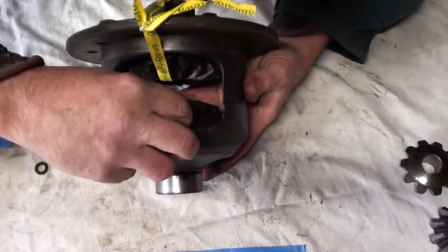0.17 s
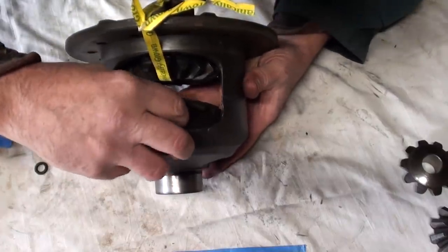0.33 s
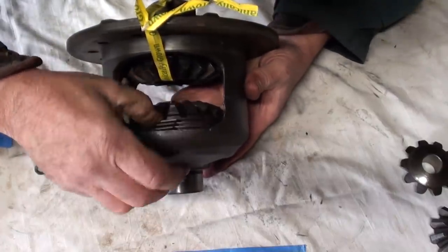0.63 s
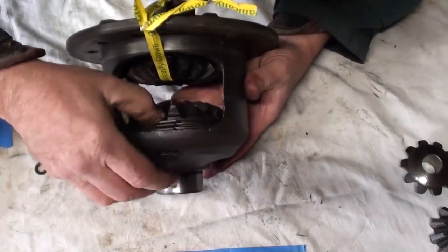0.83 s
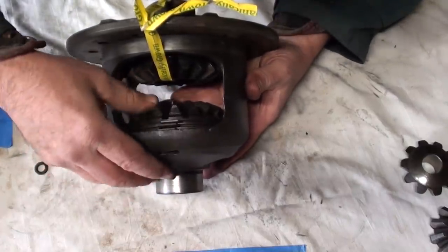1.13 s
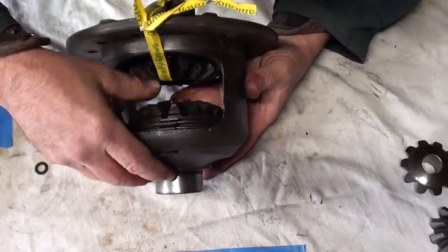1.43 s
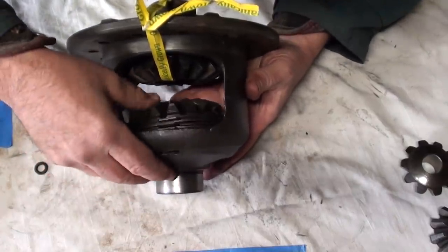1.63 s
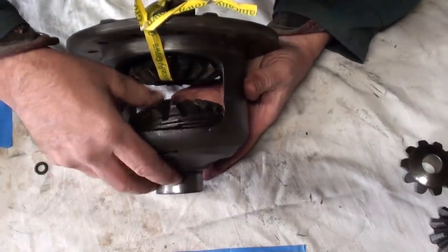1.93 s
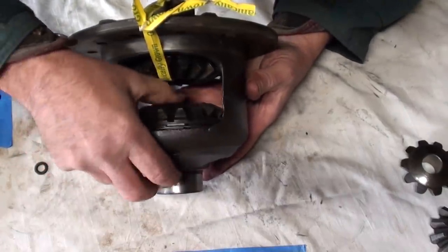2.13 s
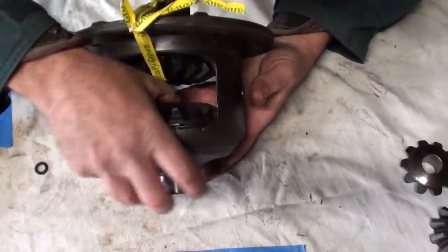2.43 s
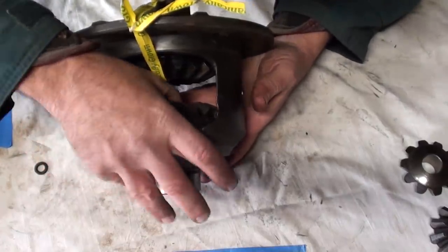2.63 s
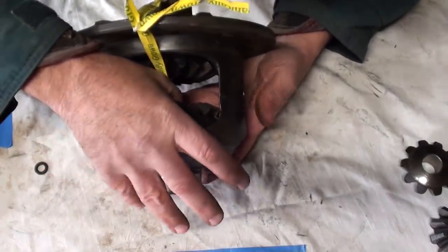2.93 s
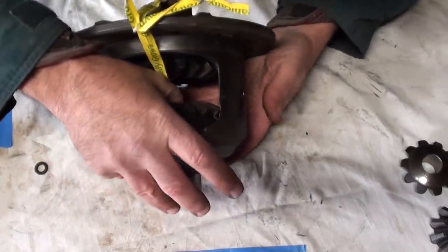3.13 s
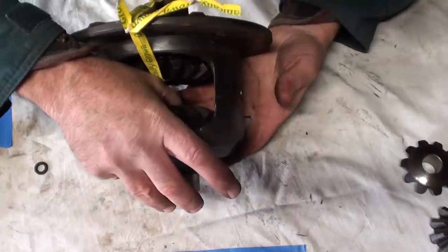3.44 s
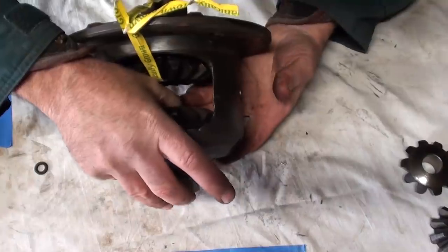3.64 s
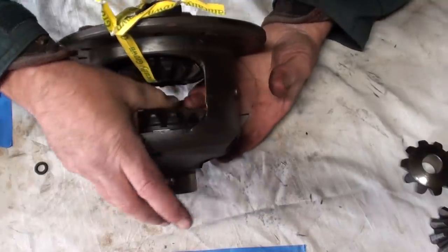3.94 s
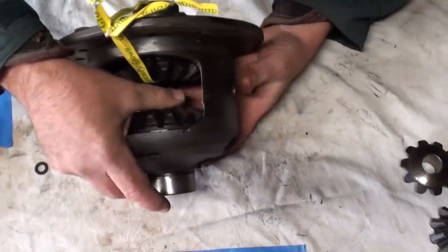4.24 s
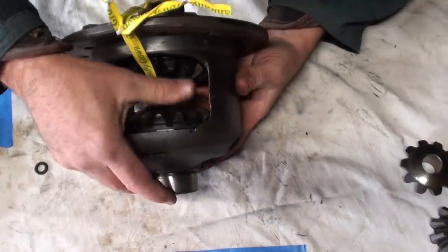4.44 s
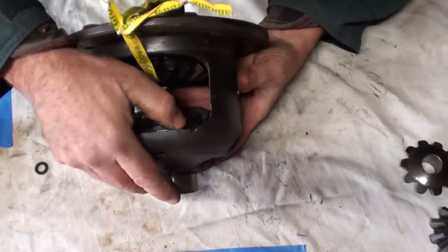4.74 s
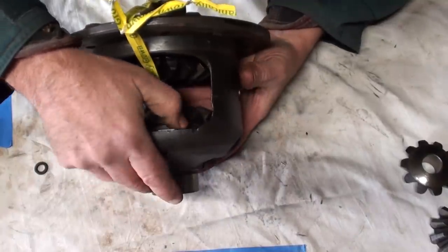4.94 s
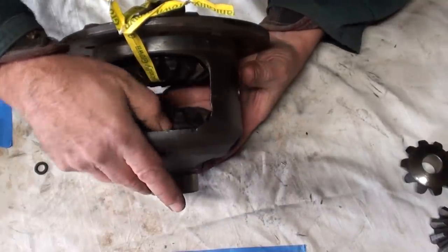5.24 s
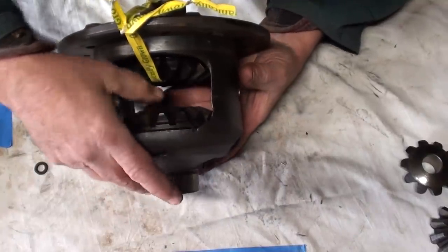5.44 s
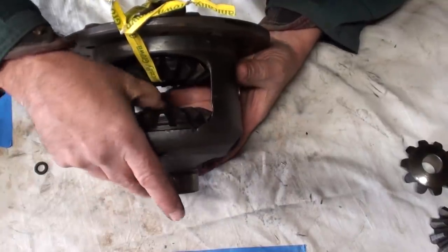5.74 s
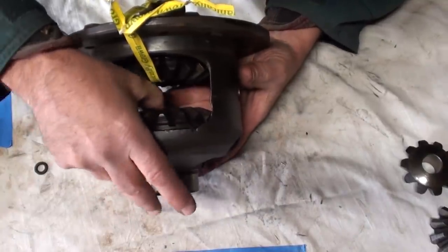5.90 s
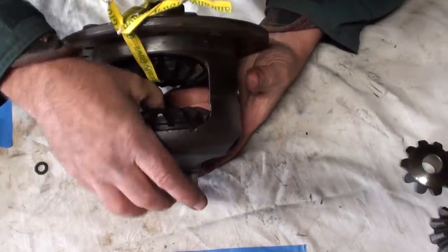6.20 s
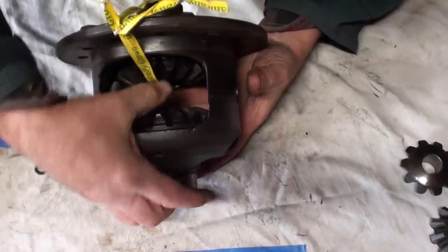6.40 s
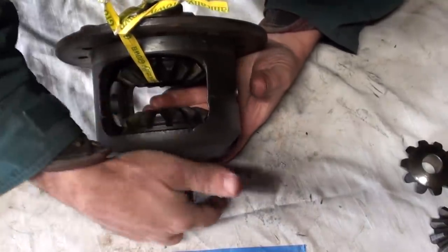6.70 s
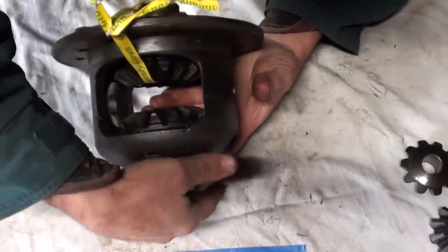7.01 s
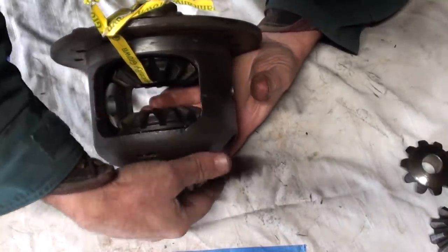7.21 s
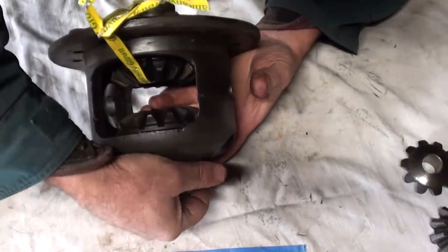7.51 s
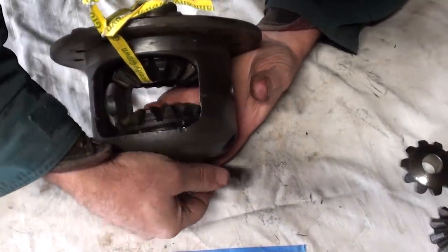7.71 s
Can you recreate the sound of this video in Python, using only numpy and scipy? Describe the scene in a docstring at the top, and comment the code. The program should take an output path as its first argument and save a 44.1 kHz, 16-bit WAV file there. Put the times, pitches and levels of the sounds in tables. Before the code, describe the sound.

A steel gear and thin plates are fitted by hand into a cast metal housing, heard close up in a quiet workshop with a slight short echo. A plate clinks sharply at 0.3 seconds. From 0.8 to about 2 seconds, small clicks, thin clinks and short gritty scrapes follow, while the housing rocks with soft thuds on a cloth-covered bench. After a lull, the loudest burst of clicks comes at 3.4 seconds with a scrape and a heavy thud, then another sharp click and bump at 3.6 and lighter ticks. Near 5.1 seconds the gear is struck and rings brightly, choked at once by a grip. A single click at 6.1 leads to soft bumps, a very faint creak at 7.2, and a last metallic knock with a deep thud at 7.7. Faint finger rubbing and steady low room hiss continue throughout.

```python
"""A steel gear and clutch plates are worked by hand into a cast housing on a cloth-covered bench.
First a plate clinks; then parts click and scrape, and the rocking housing thuds on the bench.
After a lull, loud clicks come with a heavy thud at 3.4 s. Near 5.1 s the gear rings until it is gripped.
A faint creak at 7.2 s leads to a last knock and thud. Fingers rub and a quiet workshop hisses all along."""
import sys
import numpy as np
from scipy import signal
from scipy.fft import rfft, irfft
from scipy.io import wavfile
from scipy.ndimage import uniform_filter1d

SR = 44100
rng = np.random.default_rng(int(sys.argv[2]) if len(sys.argv) > 2 else 0)


def transcribe(signal):
    """Save signal, clipped to [-1, 1], as a 16-bit WAV file at the path in sys.argv[1]."""
    frames = np.atleast_2d(signal).T
    limited = np.clip(frames, -1, 1)
    pcm = np.round(limited * 32767).astype(np.int16)
    wavfile.write(sys.argv[1], SR, pcm)


N = 346626

# Steel hits steel. Each row: start in seconds, level in dB, centre of the crack's tone in Hz,
# extra gain for the housing's ring in dB.
CLINKS = [(0.0627, -34.5, 5410, -9), (0.3087, 0.5, 8100, -36), (0.321, -5.5, 7300, -16),
          (0.8169, -14, 5100, -34), (0.8254, -16.5, 8100, -23), (0.9215, -28.5, 7200, -11),
          (0.931, -20, 5360, -19.5), (1.3145, -29, 3250, -17), (1.396, -27, 5230, -36),
          (1.413, -32, 3590, -29), (1.473, -31.5, 5100, -16), (1.632, -16, 6440, -10.5),
          (1.6719, -5.5, 7400, -32), (1.69, -34, 3310, -13), (1.73, -22, 8100, -13),
          (1.7392, -8.5, 4760, -29), (1.819, -34, 2480, -18), (1.95, -27, 3330, -13),
          (1.9633, -20.5, 7220, -25), (1.9844, -26, 3270, -16), (2.0217, -29, 4630, -17),
          (2.0796, -31, 5830, -13), (2.725, -23.5, 7450, -37), (3.1943, -24, 1900, -15),
          (3.217, -20, 1510, -20), (3.2278, -28, 1490, -26), (3.321, -35, 5500, -30),
          (3.348, -5.5, 6300, -40), (3.3653, -13, 6900, -8), (3.3742, -2.5, 5070, -17),
          (3.3846, 1, 6600, -15.5), (3.3947, -2.5, 4740, -16.5), (3.4421, -17.5, 5500, -13.5),
          (3.6352, 0, 4360, -28.5), (3.7811, -27.5, 3210, -26), (3.81, -18, 7100, -2.5),
          (3.8244, -12.5, 4900, -15), (3.8679, -29, 5230, -7.5), (3.909, -30, 2330, -14),
          (4.185, -31, 1300, -18), (4.329, -33, 6740, -17), (4.8314, -35, 4800, -32),
          (4.9327, -42, 3420, -23), (5.0119, -22, 3320, -44), (5.039, -36, 7000, -32),
          (5.0673, -23, 1330, -38), (5.0841, -12, 4470, -22.5), (5.111, -3.5, 7050, -16.5),
          (5.1463, -16, 6700, -13), (5.1543, -7, 6460, -17.5), (5.2378, -29, 5260, -18),
          (5.28, -33, 3730, -25), (5.6043, -27, 5170, -33), (5.9498, -26, 6770, -34),
          (5.969, -30, 7100, -41), (6.148, -13, 3730, -20.5), (6.7917, -26, 1270, -33),
          (6.99, -27, 6660, -17.5), (7.6991, -16, 6740, -31), (7.7209, -6, 4140, -12),
          (7.7596, -17, 1780, -19), (7.8554, -20, 7150, -23)]
# The notes (modes) each steel part rings with. Each row: pitch in Hz, level in dB, seconds to fade 60 dB.
HOUSING_HIGH_MODES = [(4750, -12, 0.062), (5230, -8.5, 0.13), (5400, -11.5, 0.21), (6164, -25, .08),
                      (7130, -8.5, 0.11), (7280, -16, 0.17), (7200, -12.5, 0.13), (7870, -15, .09),
                      (8300, -18, .08), (8450, -27, 0.084), (9900, -35, 0.058), (10800, -33, 0.066)]
HOUSING_LOW_MODES = [(1260, -12, 0.031), (1435, -8, 0.026), (1956, -9, .08), (2042, -12, 0.076),
                     (2407, -11.5, .08), (2540, -15.5, 0.054), (3200, -13.5, 0.077)]
GEAR_MODES = [(1523, -32, 0.3), (2438, -19, 0.18), (3086, -20, 0.41), (3467, -25, 0.22), (4760, -5, .2),
              (5280, -11.5, 0.35), (5440, -14, .4), (6760, -11, 0.67), (7150, -0.5, 0.84), (7326, -10, .4),
              (8048, -12, .2), (8724, -25, .3), (9100, -24, .3), (9300, -11, 0.26), (9400, -17, 0.25),
              (10400, -17.5, 0.34), (11750, -21, .4), (12320, -22.5, 0.17), (13730, -35, .2)]
PLATE_MODES = [(1538, -7.5, 0.088), (2520, -16.5, 0.22), (3330, -15, 0.17), (4560, -12, 0.16),
               (5270, -8, 0.13), (6810, -6, 0.069), (7270, -15, 0.19), (7430, 1, 0.06), (7600, -2, .11),
               (8100, -0.5, 0.091), (9430, 0, .1), (10310, -9, .13), (10600, -18, 0.068), (12200, -7, .05)]
SHIM_MODES = [(3314, -8.5, 0.38), (5810, -8, 0.078), (8900, -5, 0.057)]
# Blows on the loose gear. Each row: start in seconds, level in dB, seconds until it is gripped.
GEAR_STRIKES = [(5.111, -10, 0.046), (5.156, -17, 0.01)]
# Blows on a clutch plate and on a shim (a thin spacer). Each row: start in seconds, level in dB.
PLATE_STRIKES = [(.310, -19), (0.321, -28), (0.921, -54), (1.603, -47.5), (1.673, -36), (3.349, -27),
                 (5.068, -48)]
SHIM_STRIKES = [(.322, -45), (.818, -50), (.826, -33.5), (1.642, -30), (1.69, -33), (1.739, -45),
                (1.951, -36.5), (1.985, -51)]
# The housing rocks on the bench. Each row: start in seconds, level in dB, main pitch in Hz.
THUDS = [(0.009, -35.5, 226), (0.033, -31, 340), (0.058, -35, 230), (0.242, -39.5, 344), (0.261, -42, 258),
         (0.307, -35, 258), (0.817, -34.5, 407), (1.017, -30.5, 320), (1.29, -41, 328), (1.313, -25.5, 303),
         (1.401, -40, 355), (1.48, -40, 262), (1.584, -43, 347), (1.634, -34.5, 320), (1.654, -31, 274),
         (1.685, -34, 255), (1.739, -38, 330), (1.95, -31.5, 280), (1.98, -28, 365), (2.05, -38, 245),
         (2.171, -35.5, 312), (2.967, -38, 263), (3.011, -43, 332), (3.036, -31, 333), (3.105, -39.5, 333),
         (3.216, -36.5, 352), (3.351, -36, 312), (3.372, -19.5, 295), (3.394, -32, 283),
         (3.636, -21.5, 369), (3.767, -36.5, 342), (3.821, -35, 263), (3.9, -45, 266), (4.186, -39.5, 324),
         (4.327, -44.5, 397), (4.593, -44.5, 262), (4.74, -37, 332), (4.882, -43, 339), (5.013, -41, 376),
         (5.087, -33, 372), (5.123, -34.5, 262), (5.159, -35.5, 270), (5.229, -44, 356), (5.601, -41, 386),
         (6.148, -30.5, 317), (6.506, -28, 269), (6.79, -28, 303), (6.819, -42, 243), (6.935, -41.5, 242),
         (6.986, -31.5, 246), (7.191, -40.5, 330), (7.718, -25, 267), (7.76, -32.5, 258)]
# Deep shakes of the whole bench as the housing settles. Each row: start in seconds, level in dB.
SHAKES = [(0.3, -53), (1.304, -55), (1.651, -48.5), (1.942, -53), (3.381, -31.5), (3.631, -48),
          (4.349, -58), (5.019, -48), (5.109, -47), (6.138, -40), (6.995, -58), (7.706, -31.5)]
# The notes of the bench. Each row: pitch in Hz, level in dB, seconds to fade 60 dB.
BENCH_TOP_MODES = [(142.4, -16.5, 0.17), (200.4, -18.5, 0.21), (244.7, -12, 0.25), (287.8, -13, 0.17),
                   (340, -12, 0.23), (405.3, -9, 0.13), (568, -21, 0.093), (790, -20.5, 0.11)]
BENCH_DEEP_MODES = [(60.6, -5.5, 0.25), (82.3, -3, 0.33), (105.9, -6, 0.35), (140.4, 3, 0.18)]
# Gritty slides. Each row: start in seconds, length in seconds, level in dB.
SLIDES = [(0, 0.075, -44), (0.218, 0.12, -49), (0.99, 0.043, -48.5), (1.378, 0.029, -47.5),
          (1.471, 0.046, -53), (1.634, .075, -35), (1.947, 0.093, -47.5), (2.411, 0.094, -53),
          (2.5, 0.081, -55), (2.938, 0.14, -57.5), (3.069, 0.19, -54), (3.36, 0.049, -25.5),
          (3.644, 0.11, -54.5), (4.254, .14, -49.5), (4.926, .043, -48.5), (5.112, 0.074, -32.5),
          (5.724, .063, -57), (6.593, 0.056, -54.5), (6.901, 0.15, -59), (7.702, .039, -40)]
# Faint rubbing of fingers and cloth. Each row: time in seconds, level in dB.
RUB_LEVELS = [(0.0, -57), (2.87, -58), (3.24, -53), (4.95, -58), (5.12, -51), (5.39, -57.5), (7.22, -55.5),
              (7.71, -61.5), (7.86, -53.5)]
# The three slips of the creak. Each row: time in seconds, level in dB.
CREAK_SLIPS = [(7.223, -50), (7.252, -47), (7.31, -51)]
# The tone of the rubbing and of the hiss. Each row: frequency in Hz, relative level in dB.
RUB_SPECTRUM = [(300, 4.5), (800, 0), (1500, 0.5), (3000, -1), (5000, 3), (7500, 0.5), (11000, -8),
                (16000, -2.5)]
HISS_SPECTRUM = [(18, -51), (30, -26), (66, 2.5), (233, 1.5), (364, 3.5), (512, 2.5), (740, 2.5),
                 (2170, -4.5), (3220, -6), (3580, 1.5), (3980, -8), (4780, 0), (5740, -4.5), (14800, -13.5),
                 (16000, -9)]
# How alike the hiss is on the left and right. Each row: frequency in Hz, likeness from 0 to 1.
HISS_LIKENESS = [(60, 0.93), (180, 0.68), (550, 0.047), (1650, 0.025), (4970, 0.41), (15000, 0.78)]


def clinks():
    """Steel meets steel in a burst of tiny impacts: a crack, while the housing's ring builds up."""
    out, t = np.zeros(N), np.arange(SR // 4) / SR
    for start, level_db, tone_hz, ring_db in CLINKS:
        contact_s = 0.0034 * np.exp(0.31 * rng.standard_normal())
        progress = t / contact_s
        pressure = progress ** 1.5 * np.exp(-progress * 2.47)
        impacts = rng.standard_normal(SR // 20) * pressure[:SR // 20]
        crack = signal.fftconvolve(impacts, cast_steel(count=50, snap=2.3))
        crack = oily_tone(crack, tone_hz, broad=0.17)
        tilt_db = 2 * np.log2(tone_hz / 6300)   # duller contacts stir the low notes more, the high less
        high = from_db(tilt_db) * ring(HOUSING_HIGH_MODES, t, spread_db=3)
        low = from_db(-tilt_db) * ring(HOUSING_LOW_MODES, t, spread_db=2)
        build_up = 1 - np.exp(-progress * 4.4)
        add(out, start, from_db(level_db + ring_db) * (high + low) * build_up)
        add(out, start, from_db(level_db - 6.5) * peak_one(crack))
    return out


def loose_parts():
    """Gear, plate and shim ring with their own notes when struck; a grip chokes the gear."""
    out, t = np.zeros(N), np.arange(SR // 2) / SR
    onset = 1 - np.exp(-t / 0.0004)
    for start, level_db, free_s in GEAR_STRIKES:
        grip = fade(np.maximum(t - free_s, 0), fade_s=0.023)
        add(out, start, from_db(level_db) * ring(GEAR_MODES, t, spread_db=3) * grip * onset)
    for modes, strikes in (PLATE_MODES, PLATE_STRIKES), (SHIM_MODES, SHIM_STRIKES):
        for start, level_db in strikes:
            add(out, start, from_db(level_db) * ring(modes, t, spread_db=3) * onset)
    return out


def bench_thuds():
    """The housing thuds through the cloth; at separately listed moments the bench gives a deep shake."""
    out, t = np.zeros(N), np.arange(SR // 4) / SR
    for start, level_db, hz in THUDS:
        detune = 1 + 0.062 * rng.standard_normal()   # hands and load shift the bench top's pitch
        modes = [*np.array(BENCH_TOP_MODES) * [detune, 1, 1], (hz, 7, 0.035)]
        thud = ring(modes, t, spread_db=3.5) * (1 - np.exp(-t / 0.0021)) ** 2
        add(out, start, from_db(level_db) * peak_one(thud))
    out = cut_bass(out + 1e-18, hz=120)   # the thuds carry little deep bass
    for start, level_db in SHAKES:
        shake = ring(BENCH_DEEP_MODES, t, spread_db=2.5) * (1 - np.exp(-t / 0.012)) ** 2
        add(out, start, from_db(level_db) * peak_one(shake))
    return out


def rubbing():
    """Gritty slides swell, stop and make the housing ring a little, over a faint rub of fingers."""
    slides = np.zeros(N)
    for start, length_s, level_db in SLIDES:
        stroke = np.sin(np.pi * np.linspace(0, 1, round(length_s * SR)) ** 0.72)
        scrape = signal.fftconvolve(stroke * grit(len(stroke)), cast_steel(count=60, snap=0.97))
        add(slides, start, from_db(level_db) * oily_tone(scrape, hz=4870, broad=0.73))
    housing = ring(HOUSING_HIGH_MODES, np.arange(SR // 8) / SR, spread_db=0)
    housing_ring = from_db(-59) * signal.fftconvolve(slides, housing)[:N]
    rub_db = np.interp(np.arange(N) / SR, *np.transpose(RUB_LEVELS))
    rub = shaped_noise(RUB_SPECTRUM, likeness=[(100, 1), (10000, 1)])[0]
    return slides + housing_ring + from_db(rub_db) * rub


def creak():
    """Surfaces stick, then slip: a wavering, sinking tone with two overtones swells at each slip."""
    t = np.arange(N) / SR
    start_hz, sink_hz_per_s, swell_s = 420, 176, 0.009
    pitch_hz = start_hz - sink_hz_per_s * np.clip(t - CREAK_SLIPS[0][0], 0, 1)
    waver = 1 + 0.025 * rms_one(uniform_filter1d(rng.standard_normal(N), size=300))
    phase = 2 * np.pi * np.cumsum(pitch_hz * waver) / SR
    tone = 0.88 * np.sin(phase) + np.sin(2 * phase) + 0.44 * np.sin(6 * phase)
    swells = sum(from_db(db) * np.exp(-np.abs(t - time) / swell_s) for time, db in CREAK_SLIPS)
    return swells * tone


def workshop_echo(sound):
    """Sound bounces off bench and walls: a short echo, thin in the bass, a bit different in each ear."""
    t = np.arange(SR // 2) / SR
    mid, side = rng.standard_normal((2, len(t))) * fade(t, fade_s=0.21) * (1 - np.exp(-t / 0.00094))
    tail = mid + 0.54 * side * [[1], [-1]]
    tail = 0.87 * tail + signal.lfilter(*signal.butter(1, 1400, "high", fs=SR), tail)
    tail /= np.sqrt(np.sum(tail[0] ** 2))
    return signal.fftconvolve(sound[None], tail, axes=1)[:, :N]


def workshop_hiss():
    """The steady, quiet noise of the room."""
    return from_db(-55) * shaped_noise(HISS_SPECTRUM, HISS_LIKENESS)


def ring(modes, t, spread_db):
    """One blow: each note fades from a slightly random strength and a random point in its wave."""
    hz, level_db, fade_s = np.transpose(modes)[:, :, None]
    strength = from_db(level_db + spread_db * rng.standard_normal(hz.shape))
    waves = np.sin(2 * np.pi * (hz * t + rng.random(hz.shape)))
    return np.sum(strength * fade(t, fade_s) * waves, axis=0)


def cast_steel(count, snap):
    """Cast steel answers a tap with a snap and many short notes, other ones at every spot."""
    hz = rng.uniform(1000, 15000, count)
    fade_s = rng.uniform(0.0055, 0.048, count)
    modes = np.transpose([hz, np.zeros(count), fade_s])
    response = ring(modes, np.arange(SR // 20) / SR, spread_db=5)
    response /= np.sqrt(np.sum(response ** 2))
    response[0] += snap
    return response


def oily_tone(sound, hz, broad):
    """Bring out a wide band around hz over a broad base; oil dulls the highest treble."""
    band = signal.lfilter(*signal.iirpeak(min(hz, 15000), 1.6, fs=SR), sound)
    base = signal.lfilter(*signal.butter(1, 900, "high", fs=SR), sound)
    return signal.lfilter(*signal.butter(2, 11500, fs=SR), band + broad * base)


def grit(size):
    """White noise whose strength jumps every few milliseconds."""
    jumps = np.clip(rms_one(uniform_filter1d(rng.standard_normal(size), size=120)), -2, 2)
    return rng.standard_normal(size) * from_db(2.95 * jumps)


def shaped_noise(spectrum, likeness):
    """Stereo noise with a given tone and a given likeness between left and right."""
    hz = np.maximum(np.fft.rfftfreq(N, 1 / SR), 1)
    mid, side = rfft(rng.standard_normal((2, N))) * from_db(at_hz(spectrum, hz))
    alike = np.clip(at_hz(likeness, hz), 0, 1)
    return rms_one(irfft(np.sqrt(1 + alike) * mid + np.sqrt(1 - alike) * side * [[1], [-1]], N))


def at_hz(table, hz):
    """Read between a table's rows, giving each octave equal room."""
    row_hz, values = np.transpose(table)
    return np.interp(np.log(hz), np.log(row_hz), values)


def cut_bass(sound, hz):
    """Weaken everything below hz."""
    return signal.sosfilt(signal.butter(2, hz, "high", fs=SR, output="sos"), sound)


def fade(t, fade_s):
    """Fall by 60 dB every fade_s seconds."""
    return from_db(-60 * t / fade_s)


def from_db(db):
    """Turn decibels into a multiplier."""
    return 10 ** (np.asarray(db) / 20)


def rms_one(sound):
    """Scale to an average strength (rms) of 1."""
    return sound / np.sqrt(np.mean(sound ** 2) + 1e-20)


def peak_one(sound):
    """Scale to a peak of 1."""
    return sound / np.max(np.abs(sound))


def add(track, start, sound):
    """Mix a sound in at a start time in seconds."""
    i = max(round(start * SR), 0)
    track[i:i + len(sound)] += sound[:N - i]


def scene():
    """The parts sound in the centre, with the room's echo and hiss around them."""
    parts = clinks() + loose_parts() + bench_thuds() + rubbing() + creak()
    return parts + from_db(-9.5) * workshop_echo(parts) + workshop_hiss()


def record(dry):
    """Drop the deepest bass, round off loud peaks and cut the highest treble."""
    rounded = 0.8 * np.tanh(cut_bass(dry, hz=45) / 0.8)
    return signal.sosfilt(signal.cheby2(14, 60, 16400, fs=SR, output="sos"), rounded)


dry = scene()
out = record(dry)
transcribe(out)
```